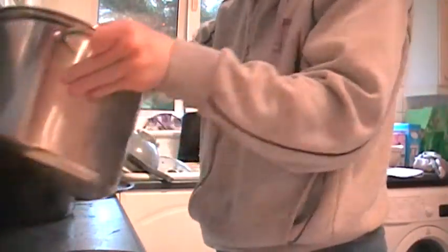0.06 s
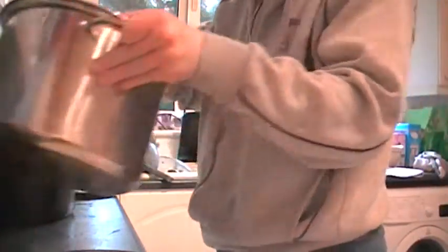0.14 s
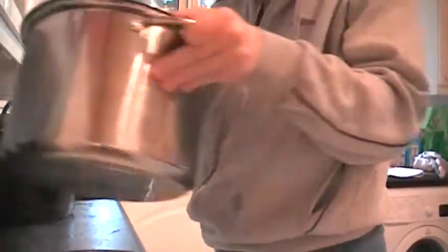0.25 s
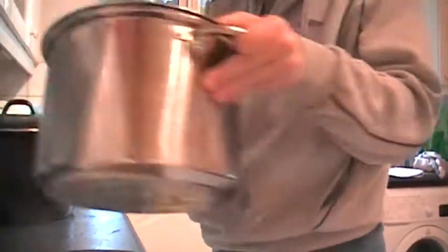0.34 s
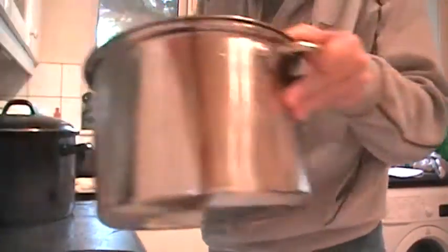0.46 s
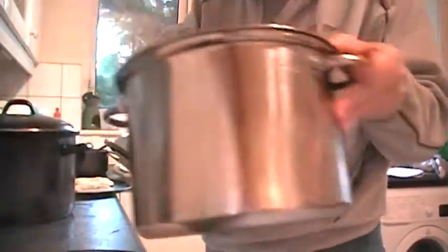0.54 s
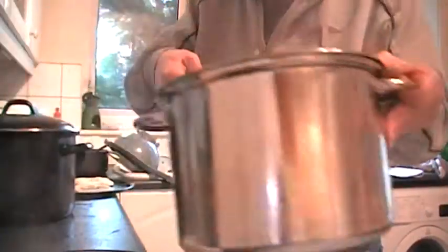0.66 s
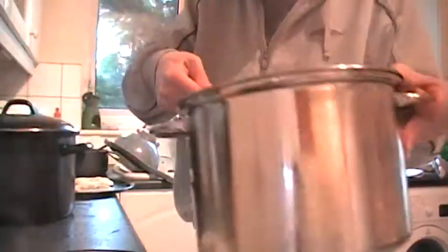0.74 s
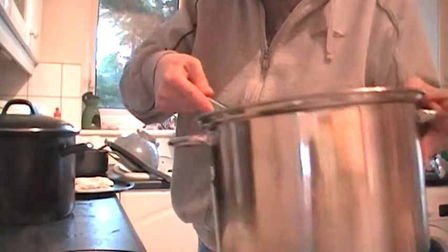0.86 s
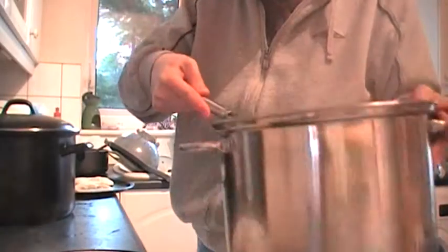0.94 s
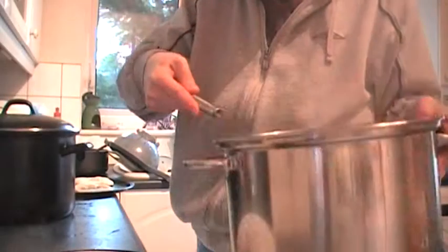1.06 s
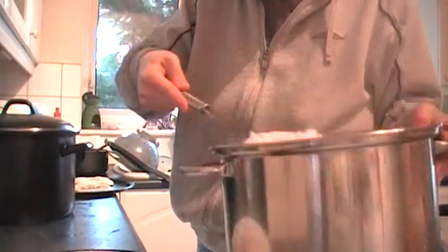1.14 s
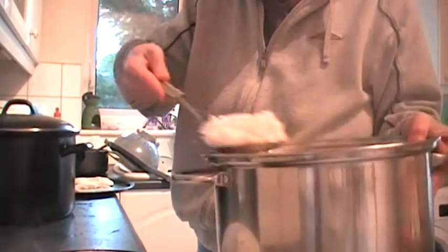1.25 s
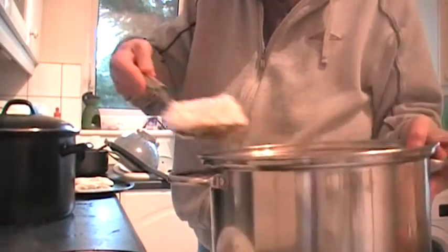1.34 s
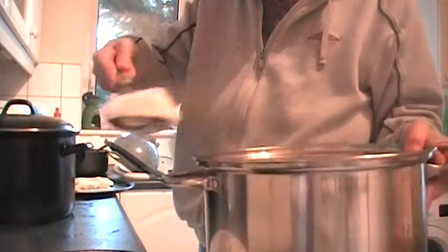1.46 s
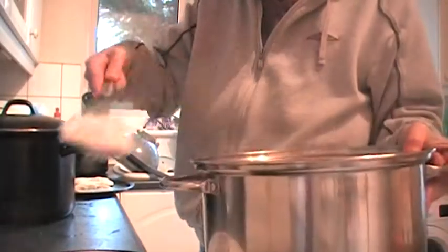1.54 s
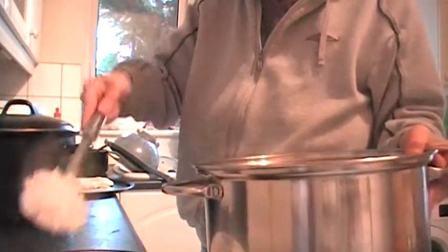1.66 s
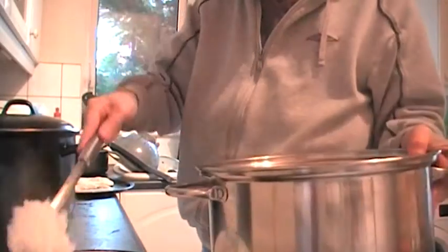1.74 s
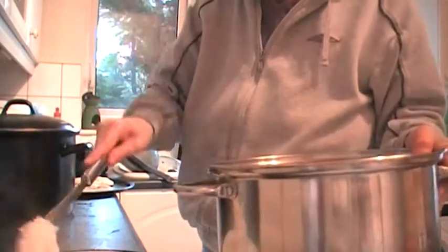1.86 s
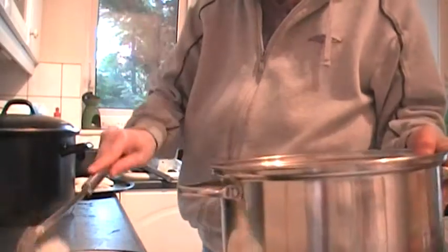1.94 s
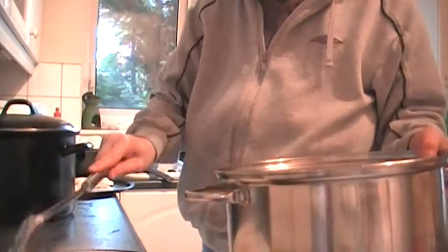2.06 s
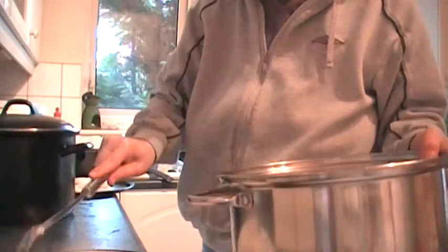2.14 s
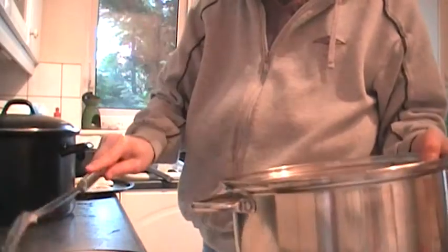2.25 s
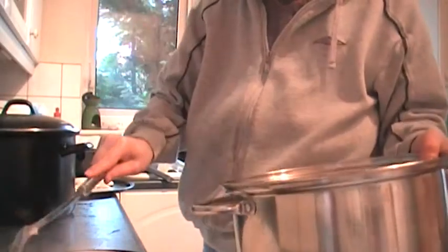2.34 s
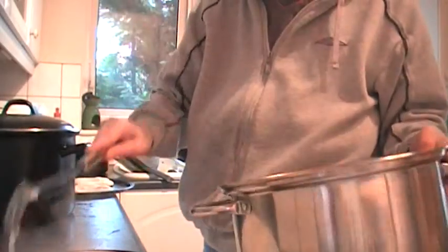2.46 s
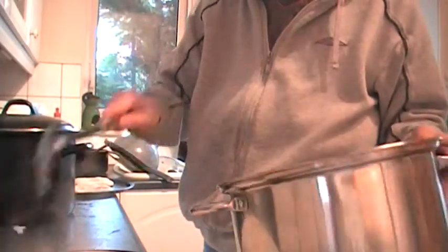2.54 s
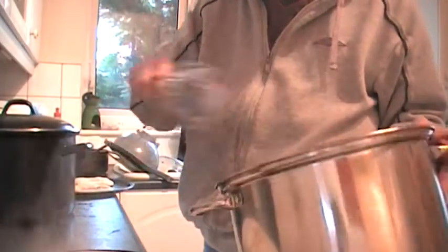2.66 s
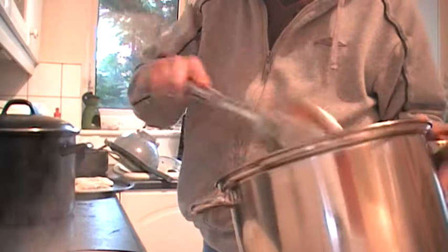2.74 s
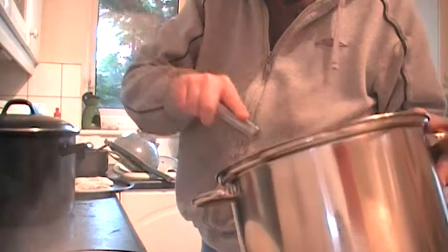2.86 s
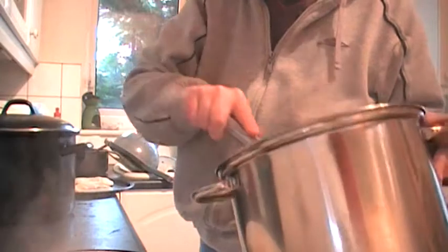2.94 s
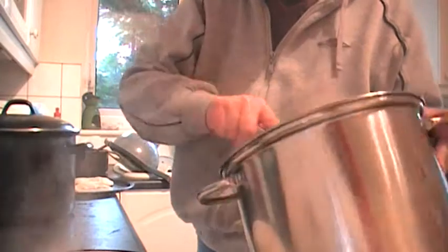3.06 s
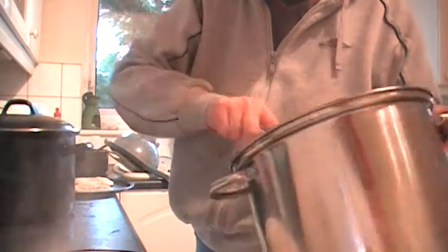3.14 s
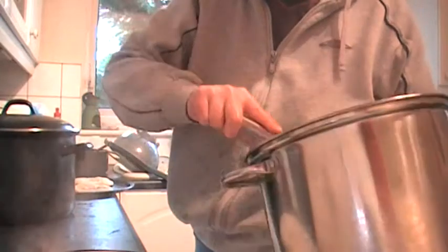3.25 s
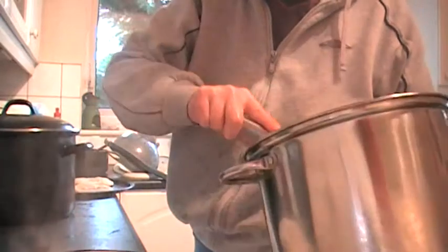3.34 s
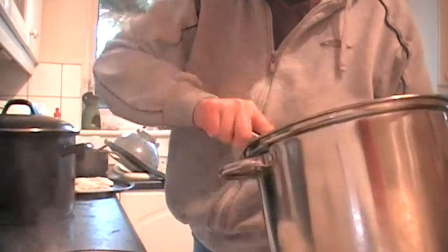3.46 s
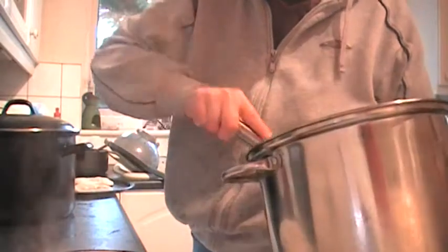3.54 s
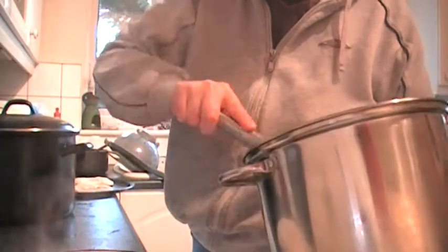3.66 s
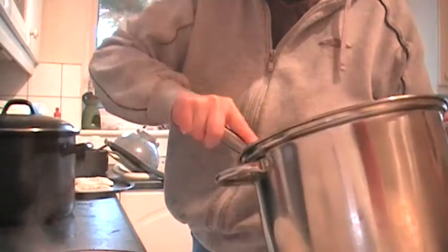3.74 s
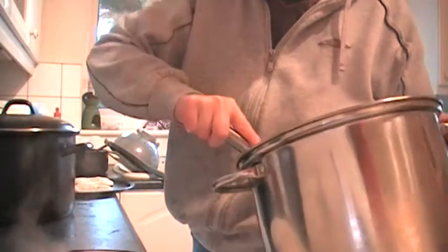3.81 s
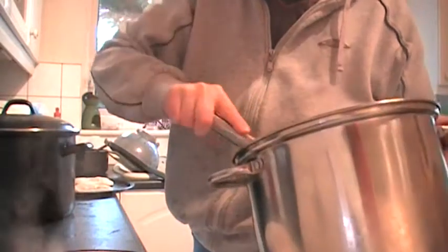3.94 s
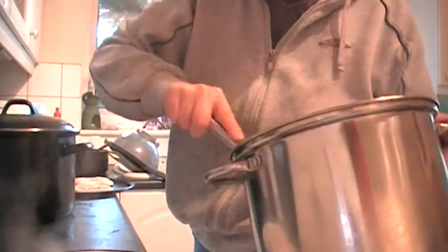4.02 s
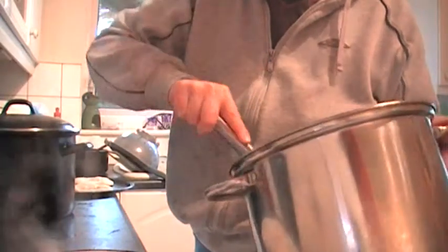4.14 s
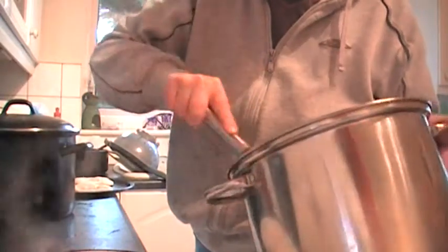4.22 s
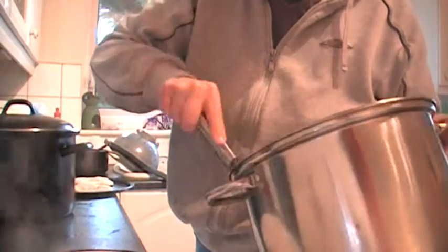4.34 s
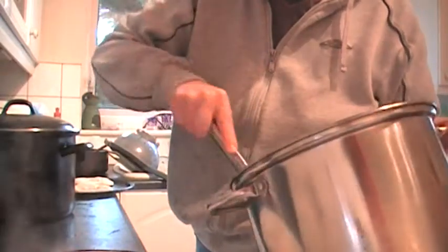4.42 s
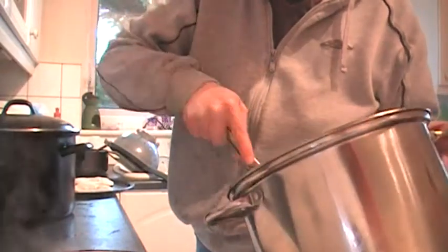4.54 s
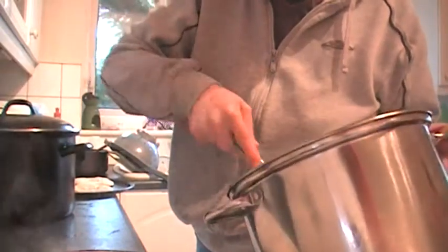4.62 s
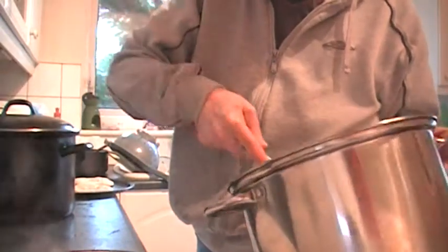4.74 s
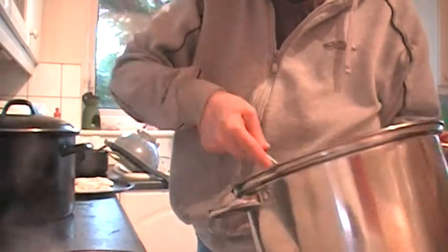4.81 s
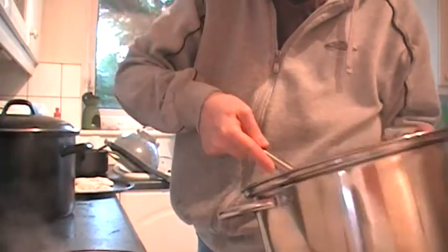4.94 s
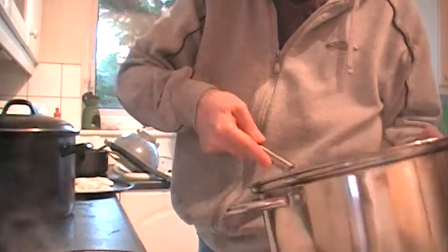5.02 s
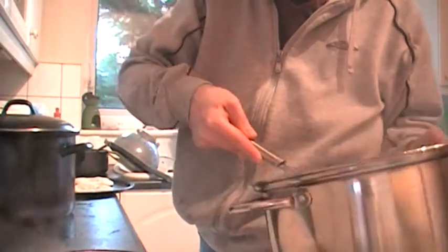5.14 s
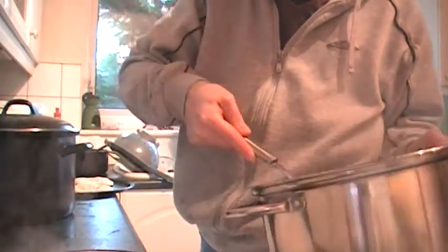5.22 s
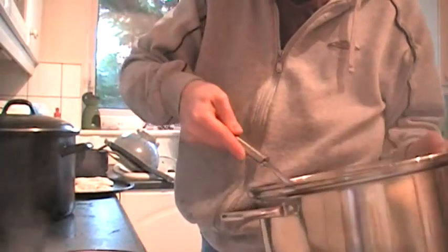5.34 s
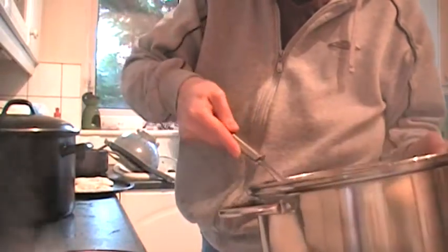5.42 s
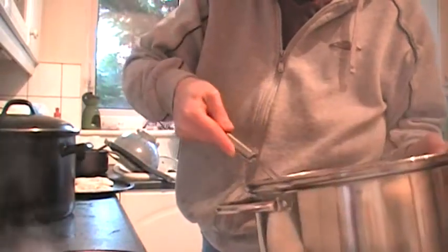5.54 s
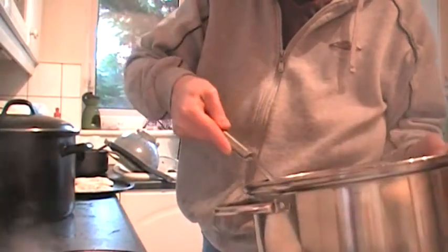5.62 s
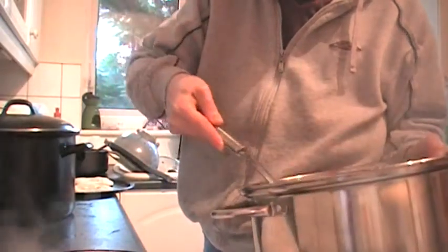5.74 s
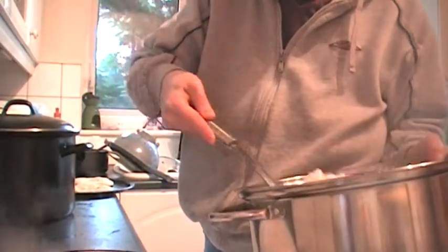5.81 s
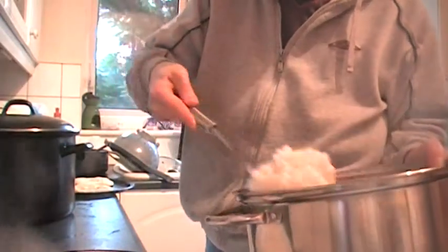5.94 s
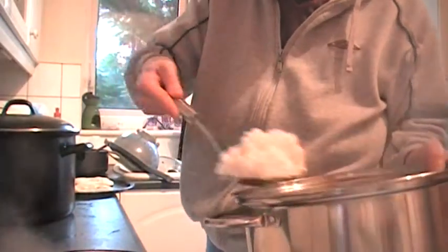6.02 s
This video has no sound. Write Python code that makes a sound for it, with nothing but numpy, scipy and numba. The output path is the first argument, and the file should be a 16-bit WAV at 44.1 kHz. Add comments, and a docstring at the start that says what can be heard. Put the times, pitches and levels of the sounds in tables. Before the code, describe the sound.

A large steel pot slides and jingles softly as it is lifted, with a clink at its handle. A metal spoon then raps a dish, ending in two very loud, bright taps. Back at the pot it clinks the rim and works inside with a rapid run of hollow knocks and gritty scrapes, which thin into faint ticks and quiet. Close stereo microphone in a small tiled kitchen; loud hits are slightly clipped and ducked.

```python
"""A steel pot drags and jingles as it is lifted, over the quiet air of a tiled kitchen. A steel spoon working
rice out of it knocks and scrapes the pot, clinks on handle and rim and is tapped hard on a dish.
Blows excite sums of decaying modes plus a noise crack; scrapes are grainy noise shaped by the steel's modes.
Early echoes and a diffuse tail surround them. A gain control ducks after loud blows and lets the room swell back.
"""
import sys
import numpy as np
from scipy import signal
from scipy.fft import rfft, irfft, next_fast_len
from scipy.io import wavfile
from scipy.ndimage import uniform_filter1d, map_coordinates
from numba import njit

SR = 44100
rng = np.random.default_rng(int(sys.argv[2]) if len(sys.argv) > 2 else 0)


def unload_wav(signal):
    """Save mono or channel-first audio to the path in sys.argv[1] as 16-bit WAV at rate SR, clipped to [-1, 1]."""
    wavfile.write(
        sys.argv[1],
        SR,
        np.round(np.clip(np.atleast_2d(signal).T, -1, 1) * 32767).astype(np.int16),
    )


N = 267951  # samples

# Spoon on pot. Each row: start in seconds, strength in dB, tilt in dB of the bass under 550 Hz, around 900 Hz
# and of the treble over 6 kHz, then the hollow tone of the air above the rice in Hz and its level in dB.
KNOCKS = [(0.1685, -20, -0.5, 9.5, -4, 430, -18.5), (0.2902, -24, -2.5, 6, -5.5, 433, -40),
          (1.1854, -56, 11.5, -11.5, -25.5, 391, -39), (2.9734, -11.5, -13, -6, .5, 386, -7.5),
          (3.0649, -17, -5, -44, -.5, 408, -18), (3.3727, -8, 6, 13.5, -2.5, 393, -15),
          (3.4401, -4, -3.5, -7, -5.5, 383, -5), (3.4915, -23, -15, -12, -10.5, 377, -32),
          (3.71, -9, -1.5, 8.5, -3, 463, -8.5), (3.7174, -19, 18.5, 19, 2, 369, -6),
          (3.7708, -4.5, -22, 3, 1.5, 382, -9.5), (4.0063, -12.5, 9, 15.5, 1, 420, -3.5),
          (4.1918, -30.5, -20, -8, -10, 423, -44), (4.2732, -15.5, 10.5, 12, 1.5, 402, -16),
          (4.2986, -13, -7, -15, -10, 396, -17.5), (4.6074, -25.5, -25, -1, -15.5, 412, -50),
          (4.7381, -27, 1.5, -10, -7, 367, -27.5), (4.7875, -28.5, -18, -6, -17.5, 390, -34.5),
          (4.8389, -26, -25, -4, -15, 380, -39), (4.8838, -29, -1, 9, -4.5, 440, -45),
          (4.9644, -42, 8.5, 4, -15, 370, -38), (4.9911, -34.5, -8, -15, -8, 358, -52),
          (5.1332, -41.5, -8.5, 12, -25, 436, -59), (5.1776, -46.5, 1, 12, -29, 371, -55),
          (5.2624, -54, 13.5, 17, -23, 470, -58), (5.2944, -64, 14, -3, -30, 358, -39.5),
          (5.3148, -35.5, -6.5, 3, -17, 340, -48.5)]
# Modes of the pot's belly, then of its wall. Each row: frequency in Hz, width in Hz, relative level in dB.
POT_BELLY = list(zip( [180, 232, 292, 353, 384, 418, 474, 533, 615, 672, 957, 998, 1280],
             [38.5, 11.0, 11, 21, 23, 27, 27, 22, 54, 31.5, 45.5, 10, 67.5],
             [-14.5, -7.0, 6.5, 5, 6.5, 7.5, 5.5, -0.5, -8.5, 2.5, -5.5, -4, -18]))
POT_WALL = [(1650, 130, -6), (2047, 350, -4), (2350, 140, -1), (3020, 28, -1.5), (3750, 210, -26.5),
            (4430, 35.9, -21), (5500, 240, -14), (5994, 280, -7), (7160, 450, -1.5), (7480, 54, 1.5),
            (8200, 76, -20), (9200, 77, -15.5), (9600, 78, -8.5), (11000, 81, -14)]
# Spectrum of steel on steel. Each row: frequency in Hz, relative density in dB per Hz.
STEEL_CRACK = [(100, -43), (300, -25), (600, -7.5), (1200, -13.5), (2500, -16), (5000, -13.5),
               (9000, -12.5), (15000, -32.5)]
# Sharpness of blows on the pot: first touch in dB at strength 0, then dB more for each dB of strength.
POT_SHARP = (3.8, .025)


def amp(db):
    """Decibels to amplitude gain: 20 dB is a factor of ten."""
    return 10 ** (np.asarray(db) / 20)


def unit(x):
    """Normalisation to an rms value of 1."""
    return x / np.sqrt(np.mean(x ** 2) + 1e-20)


def along(points, hz):
    """Interpolation of (Hz, value) points on a logarithmic frequency axis."""
    point_hz, value = np.transpose(points)
    return np.interp(np.log(hz + 1), np.log(point_hz + 1), value)


def filtered(x, response):
    """Linear filtering: the spectrum of x is multiplied by a complex response of frequency."""
    n = x.shape[-1]
    m = next_fast_len(n + 8192)  # padding keeps the end from wrapping round
    return irfft(rfft(x, m) * response(np.fft.rfftfreq(m, 1 / SR)), m)[..., :n]


def causal(x, gain_db):
    """Minimum-phase filtering: folding the cepstrum of the gains keeps all sound after the onset."""
    cepstrum = irfft(gain_db * np.log(10) / 20)
    half = len(cepstrum) // 2
    cepstrum[1:half] *= 2
    cepstrum[half + 1:] = 0
    return irfft(rfft(x, len(cepstrum)) * np.exp(rfft(cepstrum)))


def resonances(modes):
    """Modal superposition: damped resonators of alternating sign, from (Hz, width in Hz, dB) rows."""
    def response(f):
        return sum((-1) ** k * amp(db) * 1j * f * width / (hz * hz - f * f + 1j * f * width)
                   for k, (hz, width, db) in enumerate(modes))
    return response


def diffuse(pair, spread):
    """Interaural decorrelation: two unrelated signals serve as mid and side, balanced by frequency."""
    mid = pair[0]
    side = filtered(pair[1], lambda hz: amp(along(spread, hz)))
    return np.array([mid + side, mid - side])


def hush():
    """Stationary background noise: the quiet air of the house, wavering a little in level."""
    # Each row: frequency in Hz, relative density in dB per Hz.
    air_colour = [(12, -65), (20, -19.5), (81, -12), (163, -12.5), (192, -10), (346, -16.5), (622, -19.5),
                  (777, -17), (1120, -18.5), (1480, -23), (2070, -31.5), (2440, -31.5), (3060, -35.5),
                  (15900, -41.5)]
    # Each row: frequency in Hz, side over mid in dB.
    air_spread = [(60, -4), (110, 0.5), (200, -1.5), (380, 4), (700, 0.5), (1290, -3.5), (2380, 2.5),
                  (4400, -0.5), (8120, -1.5), (15000, 2)]
    noise = diffuse(rng.standard_normal((2, N)), air_spread)
    air = filtered(noise, lambda hz: amp(along(air_colour, hz)))
    waver = map_coordinates(rng.standard_normal(N // 1000), [np.arange(N) / SR * 7])  # 7 random points a second
    return amp(-56 + .8 * waver) * unit(air)


def scrape(strokes, modes, ring_db):
    """Friction excitation: an edge skips over the steel in dense uneven grains that feed wall and belly."""
    # Spectrum of the rasp. Each row: frequency in Hz, relative density in dB per Hz.
    rasp_colour = [(410, -39.5), (700, -5.5), (1040, 4.5), (1380, -17), (1590, -6.5), (3930, -2.5),
                   (4250, -9.5), (7260, -12.5), (10900, -17), (15900, -42)]
    t = np.arange(N) / SR
    s, rise_s, fall_s, db, bright_db, belly_db = np.transpose(strokes)[:, :, None]
    away = np.maximum((s - t) / rise_s, (t - s) / fall_s)
    drop_db = 20 * np.maximum(away, away ** 2)  # past 20 dB down the edge leaves the steel

    def swell(more_db, steepness):
        return np.sum(amp(db + more_db - steepness * drop_db), axis=0)

    rasp = swell(0, 1)
    shine = swell(bright_db, 1.34)  # the treble drops 1.34 dB for each dB of the rasp
    boom = swell(belly_db, 1)

    skips = amp(3.2 * map_coordinates(rng.standard_normal(N // 100), [t * 260]))  # 260 random points a second
    grains = unit(skips * rng.standard_normal(N) * rng.exponential(size=N) ** .5)
    wall = resonances(modes)

    def steel(f):
        """Resonant emphasis: the wall's modes stand out of the rasp."""
        return amp(along(rasp_colour, f)) * (1 + amp(ring_db) * np.abs(wall(f)))

    # the grains divide at 5 kHz into rasp and treble
    low = unit(filtered(grains, lambda f: steel(f) / (1 + (f / 5000) ** 6)))
    high = unit(filtered(grains, lambda f: steel(f) / (1 + (5000 / (f + 1)) ** 6)))
    drone = unit(filtered(grains, resonances(POT_BELLY)))
    return amp(-3) * (rasp * low + shine * high + amp(-1.5) * boom * drone)


def pot_sliding():
    """Friction-driven modes: the pot drags and jingles as it is lifted."""
    # Each row: loudest moment in seconds, rise and fall over 20 dB in seconds (the treble falls faster),
    # then relative levels in dB: the rasp, the brightness over it and the belly's drone over it.
    slides = [(0.001, 0.014, .15, -31, 1, 3), (.075, 0.11, 0.093, -32.5, -1.5, -13),
              (.195, .012, .09, -44, -17, 3), (.315, .012, 0.062, -42.5, -5, 7),
              (.395, 0.12, 0.097, -42, 10.5, -8), (.468, .045, .025, -35.5, 9, -5),
              (.55, .1, .55, -56.5, 7, 5.5), (.834, 0.075, .035, -44.5, -4, -4.5)]
    # Each row: frequency in Hz, width in Hz, relative level in dB.
    sliding_modes = [(1637, 72, -1.5), (1960, 53, -2), (2210, 99, -6.5), (2376, 27, -4), (2544, 26, -3),
                     (2980, 82, -1.5), (3900, 40, -8.5), (4480, 47, -5.5), (5140, 110, -11),
                     (6050, 130, -9), (6800, 90, -10.5), (6990, 97, -7.5), (7500, 40, -10.5),
                     (7800, 38, -6.5), (9200, 150, -16), (9300, 32, -26.5), (9900, 48, -17),
                     (10100, 85, -17.5), (10100, 32, -25), (10600, 30, -33.5), (11200, 160, -30)]
    return scrape(slides, sliding_modes, ring_db=19)


def struck(events, modes, colour, sharp, ring_db, crack_db, crack_s):
    """Impact excitation: each blow rings the modes at slightly new strengths and adds a short crack."""
    out, t = np.zeros(N + SR), np.arange(SR // 2) / SR
    grid = np.fft.rfftfreq(4096, 1 / SR)
    hz, width, level = np.transpose(modes)[:, :, None]
    size = amp(level) * width  # a wide peak of equal height starts stronger
    size /= np.sqrt(np.sum(size ** 2))
    size[::2] *= np.where(hz[::2] > 1400, -1, 1)  # low modes all push with the blow, high ones alternate
    rings = size * np.exp(-np.pi * width * t) * np.sin(2 * np.pi * hz * t)

    for s, db, bass_db, middle_db, treble_db, *_ in events:
        tilt = [(550, bass_db), (900, middle_db), (1500, 0), (4000, 0), (6000, treble_db)]
        scatter_db = 1.8 * rng.standard_normal(len(modes))
        ring = amp(ring_db + along(tilt, hz[:, 0]) + scatter_db) @ rings

        sharp_db = sharp[0] + sharp[1] * db
        tick = amp(sharp_db - 60 * t / 0.0062)  # the first touch dies faster than the clatter after it
        clatter = amp(-60 * t[:2048] / crack_s)
        burst = rng.standard_normal(2048) * (clatter + tick[:2048])
        crack = causal(burst, along(colour, grid) + along(tilt, grid))
        ring[:len(crack)] += amp(crack_db) * crack
        out[round(s * SR):][:len(t)] += amp(db) * ring
    return out[:N]


def pot_knocks():
    """Modal impact: the spoon rings the belly and wall of the pot together."""
    return struck(KNOCKS, POT_BELLY + POT_WALL, STEEL_CRACK, POT_SHARP, ring_db=3.5, crack_db=11, crack_s=0.07)


def hollow(width_hz=34):
    """Cavity resonance: air in the pot answers each knock with one tone, its pitch set by tilt and filling."""
    out, t = np.zeros(N + SR), np.arange(SR // 2) / SR
    for s, *_, hz, db in KNOCKS:
        decay = np.exp(-np.pi * width_hz * t)
        out[round(s * SR):][:len(t)] += amp(db) * decay * np.sin(2 * np.pi * hz * t)
    return out[:N]


def handle_clink():
    """Modal impact: the handle rings with its own set of modes."""
    # Each row: start in seconds, strength in dB, tilt in dB of bass, middle and treble.
    handle_blows = [(.897, -14.5, -1, -1.1, -1)]
    # Each row: frequency in Hz, width in Hz, relative level in dB.
    handle_modes = [(384, 15, -1), (446, 29, -8), (669, 46, -4), (960, 19, -1), (1940, 58, -1.5),
                    (2350, 28, -10), (2653, 58, -7), (2980, 52, -36), (3451, 55, -19.5), (3890, 61, -10.5),
                    (5028, 70, -38), (6062, 70, -10), (6940, 70, -7.5), (7540, 70, -23.5), (8020, 146, -8),
                    (9700, 54, -19)]
    return struck(handle_blows, handle_modes, STEEL_CRACK, POT_SHARP, ring_db=3, crack_db=11.5, crack_s=0.048)


def wall_strokes():
    """Friction-driven modes: spoon strokes along the pot's wall swell and die away."""
    # Each row: loudest moment in seconds, rise and fall over 20 dB in seconds (the treble falls faster;
    # a negative rise follows the square law alone), then relative levels in dB: the rasp, the brightness
    # over it and the belly's drone over it.
    strokes = [(1.725, 0.04, 0.1, -60, -5, -0.2), (2.995, 0.05, 0.08, -35, 7, 10.5),
               (3.09, 0.08, 0.08, -37, 5.5, 7), (3.15, 0.0949, 0.08, -43.5, 11.5, 3),
               (3.386, .009, .11, -27, 3, 9), (3.465, .018, .1, -27.5, 2.5, 13),
               (3.722, .008, .15, -28, 4, 11), (3.776, .014, .05, -24.5, 11.5, 12.5),
               (4.022, .012, 0.1024, -38, 7.5, 24), (4.075, 0.08, 0.0868, -36, 10.5, 17),
               (4.325, -0.07, 0.0446, -34.5, 5, 4), (4.43, 0.22, .36, -33, 3.5, -13),
               (4.748, .008, .13, -39, -3, -11), (4.841, .004, 0.0544, -36.5, -1.1, -8),
               (4.9, 0.07, 0.1431, -41, -2, -8.5), (5.325, 0.09, .14, -57, -29, 17),
               (5.75, 0.16, .12, -61.5, -8, 0)]
    return scrape(strokes, POT_WALL, ring_db=8)


def dish_taps():
    """Coupled modal impact: the spoon rings the dish and the worktop under it."""
    # Each row: start in seconds, strength in dB, tilt in dB of bass, middle and treble.
    taps = [(1.823, -43, -7, -5.5, -7), (1.830, -27.5, -4.5, -2, -8.5), (1.899, -39.5, -13, -2.5, -12.5),
            (1.914, -4.5, -7, 4, -1), (2.153, 11, -10, 0.5, -1.5), (2.347, 8.5, -11.5, -1.5, -2.5)]
    # Worktop, then dish. Each row: frequency in Hz, width in Hz, relative level in dB.
    worktop_modes = [(100, 12, -13), (170, 22, -10.5), (302, 17, -12)]
    dish_modes = list(zip( [420, 545, 695, 1001, 1270, 1585, 1954, 2081, 2137, 2218, 2333, 2600, 3218, 3397, 3430, 3890, 4700, 4970, 5008, 5240, 6300, 6740, 6950, 7564, 8890, 9300, 10600, 11300, 11640, 12250],
                  [69, 56, 56.5, 45, 60.5, 44.5, 61.5, 60, 29.5, 29.5, 23, 87.5, 28, 20.5, 27.5, 19, 80.5, 21.5, 25.5, 24, 15, 61, 24, 18.5, 31, 30.5, 29, 41.5, 30, 38],
                  [-10, -1, -9, -11, -14, -14.5, -5, -2, 0.5, -2.5, -10, -29, -6.5, -14, 2, -5, -14, -3, -9, -7.5, -8, -9.5, -9.5, -5.5, -11.5, -17, -19, -24.5, -24.5, -30]))
    # Steel on the dish. Each row: frequency in Hz, relative density in dB per Hz.
    dish_colour = [(100, -44), (300, -19.5), (600, -9), (1200, -7.5), (2500, -1.5), (5000, -3.5),
                   (9000, -13), (15000, -38)]
    # First touch in dB at strength 0, then dB more for each dB of strength.
    dish_sharp = (4.5, .26)
    return struck(taps, worktop_modes + dish_modes, dish_colour, dish_sharp,
                  ring_db=2.5, crack_db=2.5, crack_s=0.015)


def rim_clink():
    """Modal impact: the spoon clinks on the rim, whose modes ring with a short crack."""
    # Each row: start in seconds, strength in dB, tilt in dB of bass, middle and treble.
    rim_blows = [(2.935, -13, -10, 4.5, -8)]
    # Each row: frequency in Hz, width in Hz, relative level in dB.
    rim_modes = [(414, 60, -7.5), (467, 70, -3.5), (990, 17, -5.5), (1540, 50, -7.5), (1880, 17, -4),
                 (2300, 37, -2), (2550, 24, -7.5), (3010, 73, -7), (3811, 60, -16.5), (4545, 60, -25.5),
                 (4820, 70, -15.5), (6500, 85, -7), (7250, 37, -22.5), (8260, 52, -18.5)]
    return struck(rim_blows, rim_modes, STEEL_CRACK, POT_SHARP, ring_db=8, crack_db=10, crack_s=0.02)


def nearby(x, count=9):
    """Early reflection: worktop and cupboards send copies; the two ports differ mainly for short waves."""
    echoes = np.zeros((2, SR // 20))
    when = rng.uniform(.0004, 0.017, (2, count))  # seconds
    strength = rng.choice([-1, 1], (2, count)) * amp(-60 * when / 0.07)
    np.put_along_axis(echoes, (when * SR).astype(int), strength, axis=1)
    mid, side = signal.fftconvolve(x[None], echoes, axes=1)[:, :N]
    short_waves = filtered(side, lambda hz: 1j * hz / (7000 + 1j * hz) * 1j * hz / (6000 + 1j * hz))
    side = amp(-3.5) * short_waves
    return amp(-7.5) * mid + np.array([side, -side])


def kitchen(x):
    """Diffuse reverberation: tiled walls answer, every frequency dying at its own speed."""
    # Each row: frequency in Hz, decay time over 60 dB in seconds.
    decay_times = [(100, 0.84), (400, 0.63), (2000, 0.62), (6000, 0.6), (12000, 0.32)]
    # Each row: frequency in Hz, side over mid in dB.
    room_spread = [(60, -14.5), (300, -19), (1000, -9.5), (4000, -11), (9000, -5.5), (14000, 5.5)]
    out, step = np.zeros((2, N + 2 * SR)), 8820  # each 0.2 s of sound gets its own tail
    for start in range(0, N, step):
        hz, t, z = signal.stft(rng.standard_normal((2, SR * 3 // 4)), SR, nperseg=256)
        decay = amp(-60 * t / along(decay_times, hz)[:, None])
        tail = signal.istft(z * decay, SR, nperseg=256)[1]
        wet = signal.fftconvolve(x[None, start:start + step], tail / np.linalg.norm(tail[0]), axes=1)
        out[:, start + round(.004 * SR):][:, :wet.shape[1]] += wet  # 4 ms late
    return diffuse(out[:, :N], room_spread)


def scene():
    """Superposition of direct, early and diffuse sound: pot ahead, dish a little to the left."""
    pot = pot_knocks() + hollow()
    pot += rim_clink()
    pot += handle_clink()
    pot += wall_strokes() + pot_sliding()
    dish = dish_taps()
    # pot and dish lose their deep bass below about 130 Hz
    pot, dish = filtered(np.array([pot, dish]), lambda hz: (1j * hz / (130 + 1j * hz)) ** 3)
    direct = pot * amp([[.1], [-.1]]) + dish * amp([[.7], [-.7]])
    return direct + nearby(pot + dish) + kitchen(amp(-7) * pot + amp(-6.5) * dish) + hush()


@njit
def ducking(over_db, attack, release_db):
    """Gain control: reduction follows the excess quickly and recovers at a steady number of dB a sample."""
    out, now = np.zeros(len(over_db)), 0.
    for i in range(len(over_db)):
        if over_db[i] > now:
            now = now + attack * (over_db[i] - now)
        else:
            now = max(now - release_db, 0.)
        out[i] = now
    return out


def record(dry):
    """Compression and saturation: gain control lags a blow's first milliseconds, which clip; then band limits."""
    # The left port hears more. Each row: frequency in Hz, left over right in dB.
    port_balance = [(60, 2.5), (200, 0.5), (1000, 1.44), (3000, 0.9), (8000, 0.3)]
    heard = filtered(dry, lambda hz: amp(along(port_balance, hz) * np.array([[.5], [-.5]])))
    power = uniform_filter1d(np.mean(heard ** 2, axis=0), size=64, origin=31)
    level_db = 10 * np.log10(np.abs(power) + 1e-12)
    threshold_db, attack_s, release_db_per_s = -12.5, 0.0025, 95
    reduction_db = ducking(level_db - threshold_db, 1 / (attack_s * SR), release_db_per_s / SR)
    ducked = heard * amp(-reduction_db)
    clipped = ducked / (1 + np.abs(ducked / .99) ** 8) ** (1 / 8)
    dulled = filtered(clipped, lambda hz: 1 / (1 + 1j * hz / 14000) ** 3)  # the amplifier rolls off the top octave
    return filtered(dulled, lambda hz: hz < 16040)  # nothing passes above this limit in Hz


dry = scene()
out = record(dry)
unload_wav(out)
```